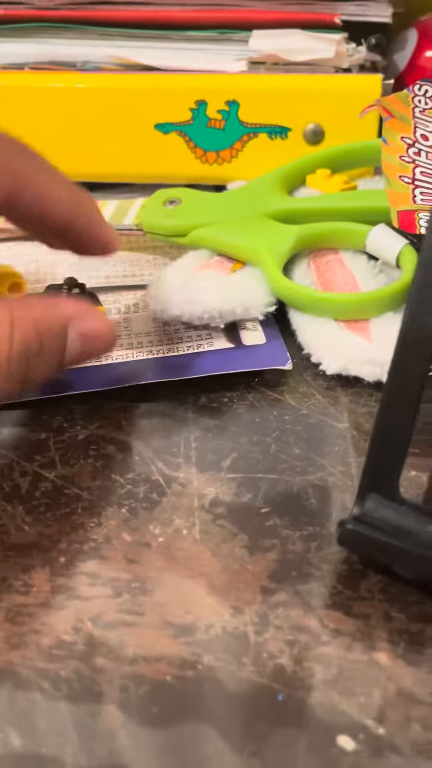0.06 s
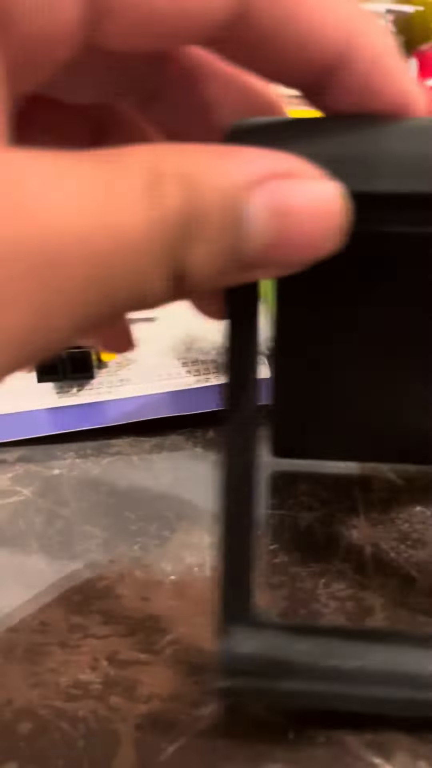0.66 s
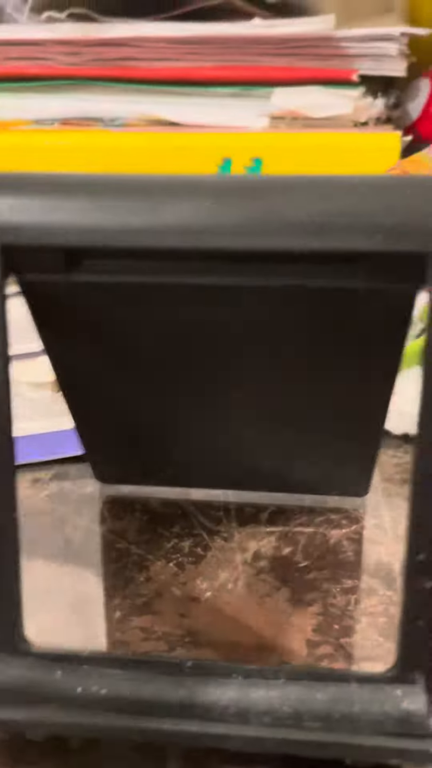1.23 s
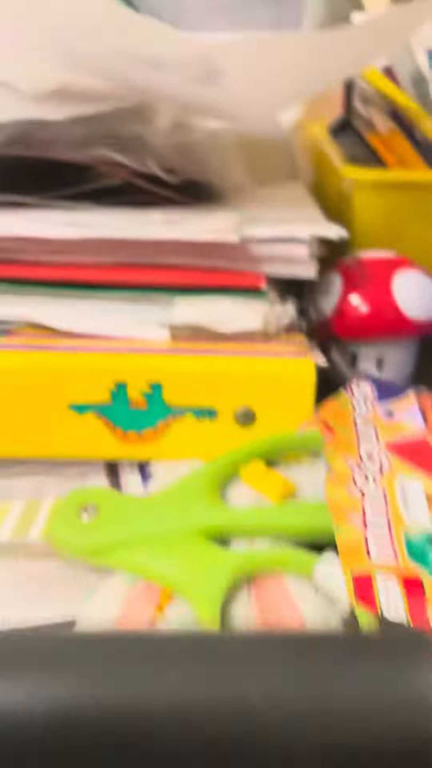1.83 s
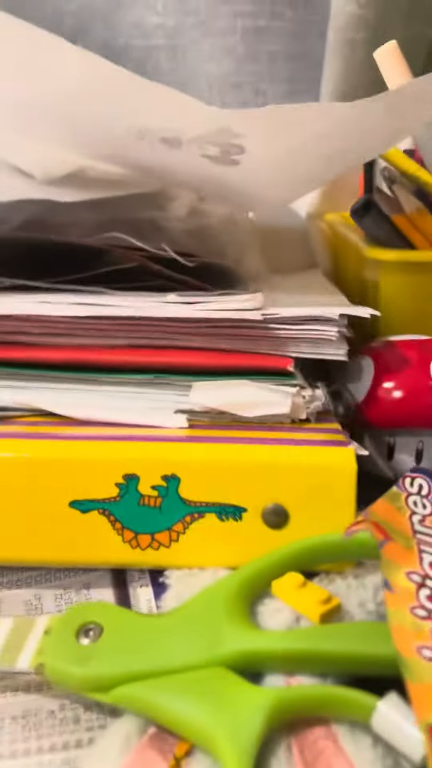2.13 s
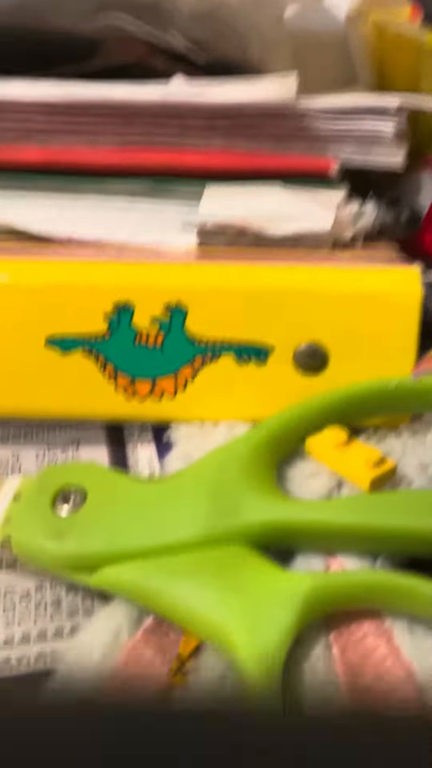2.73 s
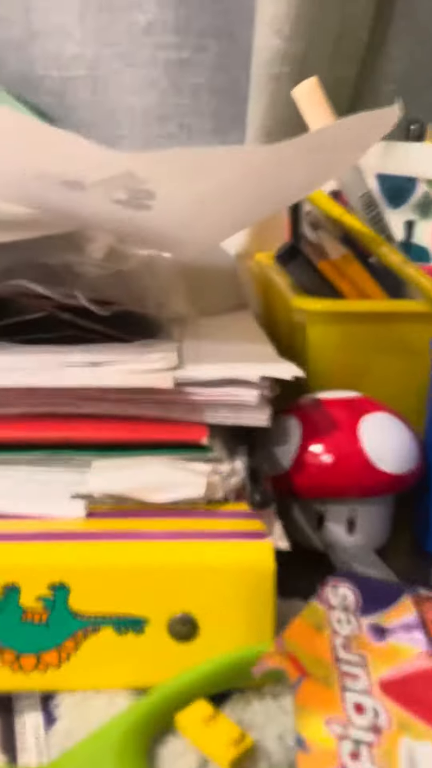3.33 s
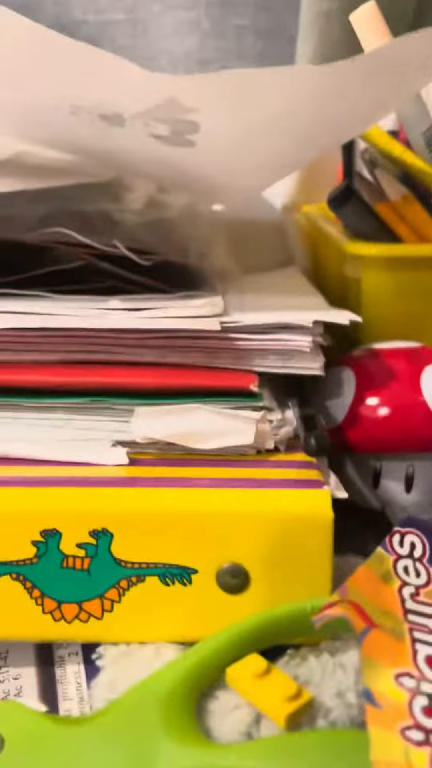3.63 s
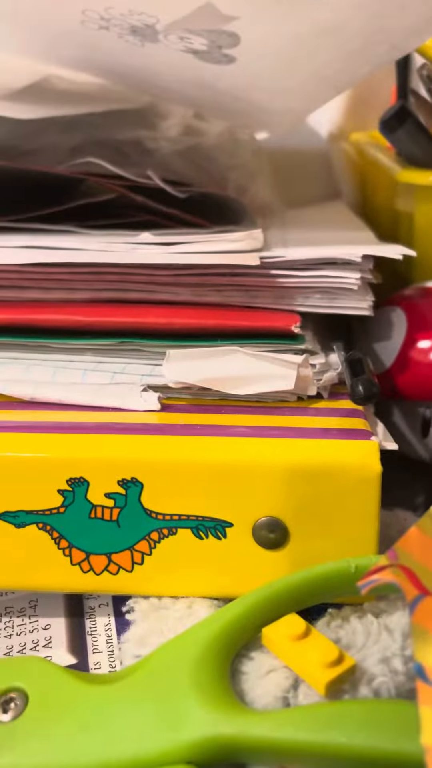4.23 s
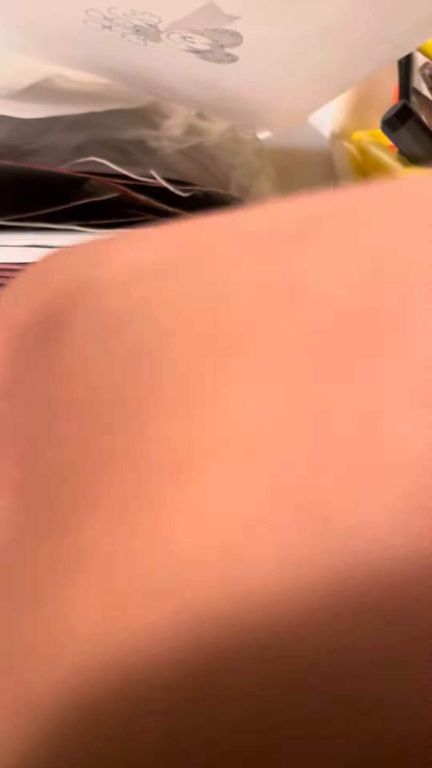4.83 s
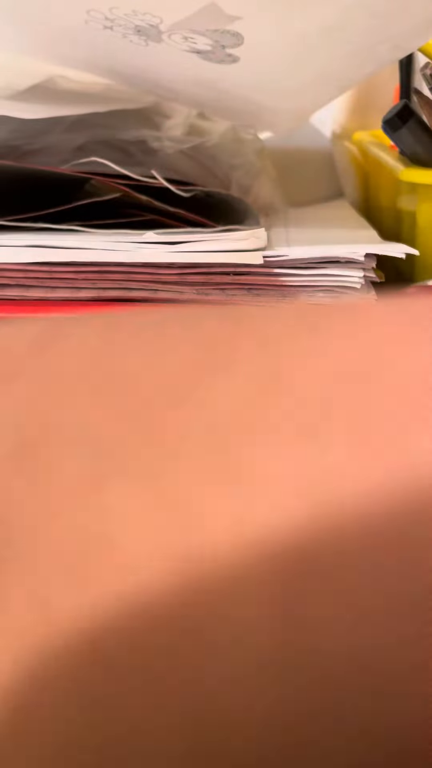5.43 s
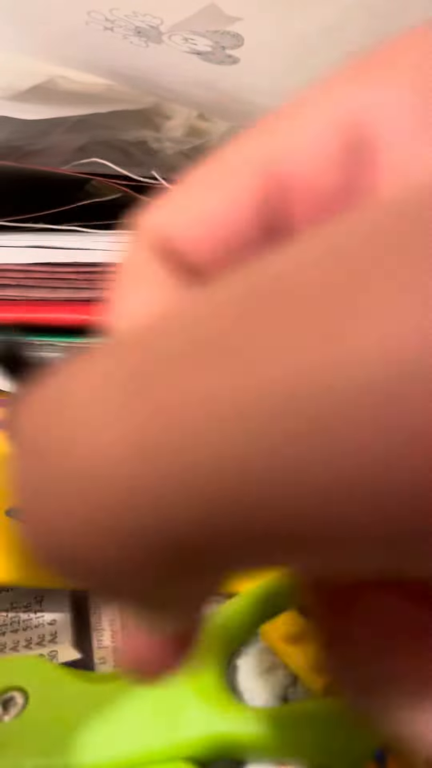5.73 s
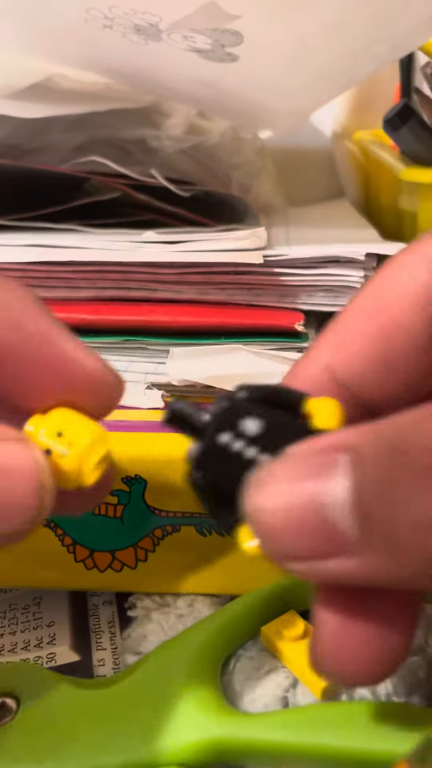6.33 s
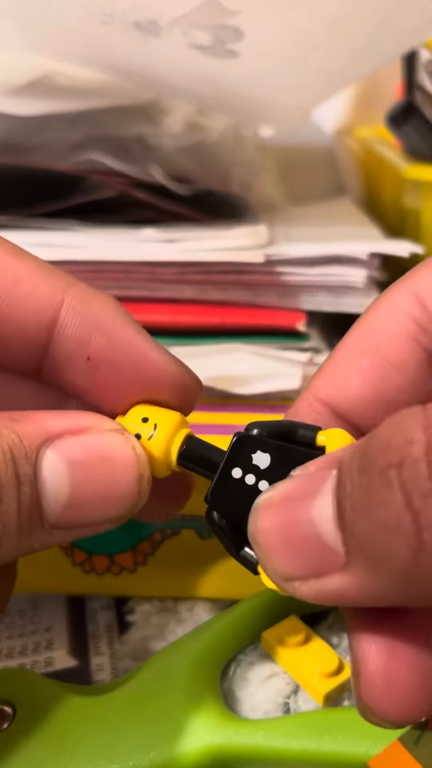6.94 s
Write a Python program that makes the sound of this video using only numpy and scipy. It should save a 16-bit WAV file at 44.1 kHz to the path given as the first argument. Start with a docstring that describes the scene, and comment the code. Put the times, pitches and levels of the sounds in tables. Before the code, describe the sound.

In a small room with a faint low hum, a phone and a plastic stand are moved about on a desk. Soft sliding and ticking give way to irregular clusters of bumps, heard through the phone's own housing. The second half turns lighter and brighter, as tiny plastic toy parts click and scrape between rubbing fingers. Everything is very close to the microphone, with almost no echo.

```python
"""A low mains hum fills a small room, and fingers start to slide and tick on plastic.
A phone is shifted on a desk beside a plastic stand: its case rubs, knocks and rattles through the housing.
Then fingers pick up small plastic toy parts, which scrape and click close to the two microphone ports.
Rubbing is noise from countless tiny slips; each contact is a scuff, a crack and a short modal ring."""
import sys
import numpy as np
from scipy import signal
from scipy.fft import rfft, irfft, next_fast_len
from scipy.io import wavfile
from scipy.ndimage import map_coordinates

SR = 44100
rng = np.random.default_rng(int(sys.argv[2]) if len(sys.argv) > 2 else 0)


def master(y):
    """Save y as 16-bit WAV."""
    cut = np.clip(np.atleast_2d(y).T, -1, 1)
    pcm = np.round(cut * 32767)  # scale
    wavfile.write(sys.argv[1], SR, pcm.astype(np.int16))


N = 307818
TIME_S = np.arange(N) / SR
HIT_S = np.arange(8192) / SR
SCUFF_SAMPLES = 600

# Mains hum, a faint side tone, the hum's octave. Each row: frequency in Hz, level in dB.
HUM_TONES = [(119.8, -54), (160, -75.5), (239.8, -72)]
# Hum and rumble, stronger once the phone has moved. Each row: time in seconds, gain in dB.
BACKGROUND_GAIN = [(0, -1.5), (.7, -1), (2, -1.5), (3.1, 0.5), (4, 2.5), (6.98, 2)]
# Parts dragged under pressure. Each row: start and end in seconds, level in dB, ring in Hz, ring Q.
SCRAPES = [(0, 0.04, -62, 3830, 1.5), (1.599, 1.778, -70, 766, 15), (1.634, 1.84, -73, 2005, 27),
           (1.893, 2.047, -87, 2225, 62), (2.902, 2.919, -38, 1510, 4.3), (3.301, 3.311, -47, 1330, 4.9),
           (3.65, 3.672, -61.5, 1950, 9.7), (4.49, 4.519, -44.5, 3500, 2.1), (4.73, 4.736, -49, 4550, 6.6),
           (5.06, 5.147, -46, 5650, 4.4), (5.143, 5.24, -60, 5300, 6.2), (5.271, 5.324, -49.5, 5250, 2.8),
           (5.661, 5.675, -40, 2120, 2.6), (5.755, 5.84, -55.5, 2010, 11),
           (5.757, 5.868, -62.5, 10800, 4.3), (6.037, 6.112, -58.5, 1490, 6.2),
           (6.254, 6.394, -58, 4000, 5)]
# Small parts tap, snap and rattle. Each row: time in seconds, level in dB, main ring in Hz,
# left-port lag in ms.
CLICKS = [(0.026, -59, 4250, 0), (0.423, -53, 5600, 0), (0.459, -54, 3370, 0), (0.529, -48, 3950, -0.013),
          (0.534, -54, 4200, 0), (0.548, -65, 5600, 0), (0.579, -50.5, 5500, 0),
          (0.664, -49.5, 3080, -0.07), (0.689, -49, 8400, 0), (0.706, -40.5, 5440, 0),
          (0.737, -57, 5030, 0), (0.76, -39, 5540, 0), (0.777, -48.5, 1930, 0.075), (0.941, -53.5, 9100, 0),
          (1.31, -60.5, 2160, 0), (1.44, -46, 2020, 0.38), (1.473, -35, 6260, 0.28),
          (1.519, -41, 5260, -0.56), (1.595, -44, 1990, -0.54), (2.141, -59, 2500, 0),
          (2.159, -33, 2600, 0.39), (2.286, -40.5, 3740, 0.45), (2.395, -55, 2130, 0.74),
          (2.417, -62, 2430, 0), (2.428, -48.5, 2300, -0.69), (2.442, -45, 2000, 0.34),
          (2.535, -57, 3000, 0), (2.611, -41.5, 5400, .2), (2.645, -64, 5100, 0), (2.766, -62, 1106, 0.23),
          (2.783, -43, 1410, 0.32), (2.791, -40.5, 1500, 0.33), (3.224, -47.5, 1234, 0),
          (3.28, -52, 2240, -0.099), (3.287, -39, 1890, -0.18), (3.423, -43, 1880, 0.2),
          (3.432, -48, 10060, 0), (3.446, -62.5, 2440, 0), (3.556, -43, 1290, -.2),
          (3.673, -26, 2060, 0.33), (3.68, -21.5, 2380, 0.13), (3.861, -41.5, 1400, 0.29),
          (3.878, -40, 910, 0.37), (4.057, -50, 682, 0.34), (4.487, -48, 5650, 0), (4.502, -33, 3620, 0.18),
          (4.512, -31, 2900, -0.044), (4.533, -21.5, 2000, 0.14), (4.538, -29.5, 1260, 0.11),
          (4.591, -41, 1260, 0.069), (4.621, -38, 860, 0.16), (4.631, -38, 1180, 0), (4.649, -37, 5500, 0),
          (4.693, -49, 9600, 0), (4.717, -26, 4760, -0.2), (4.718, -31, 11500, -0.34),
          (4.729, -42.5, 2060, 0), (4.747, -31.5, 11600, -0.087), (4.81, -37, 1050, -.6),
          (4.843, -72, 8000, 0), (4.93, -55, 4500, -0.086), (5.015, -52, 1930, 0.14),
          (5.071, -35.5, 3900, 0.013), (5.084, -27.5, 4200, 0.17), (5.1, -36, 6030, 0),
          (5.12, -36, 4900, 0), (5.137, -42, 3500, 0.23), (5.152, -46, 2800, 0), (5.213, -48, 1410, 0),
          (5.268, -49, 1010, 0), (5.311, -31, 5300, -0.45), (5.319, -29.5, 5240, -0.32),
          (5.355, -39, 2200, 0.011), (5.357, -41.5, 5500, 0), (5.428, -44.5, 4840, 0),
          (5.491, -58, 10100, 0), (5.578, -46, 2910, 0), (5.65, -48, 10000, 0), (5.66, -30, 1560, 0.25),
          (5.671, -42, 10100, 0.17), (5.746, -41.5, 800, 0.083), (5.771, -59, 1990, 0.11),
          (5.914, -43.5, 10100, 0), (5.945, -57, 9000, 0), (5.961, -44.5, 1590, -0.6),
          (6.031, -51, 2200, -.4), (6.091, -23.5, 2200, 0.28), (6.092, -27, 4100, 0.13),
          (6.093, -25, 10600, 0.18), (6.141, -30.5, 11600, -0.42), (6.151, -46.5, 2610, 0),
          (6.168, -48, 10300, 0), (6.271, -33.5, 4200, 0.26), (6.376, -39, 5900, 0),
          (6.385, -39.5, 790, 0.29), (6.425, -35, 4670, 0.21), (6.476, -39, 1820, -0.52),
          (6.498, -42, 1750, -0.47), (6.515, -50, 1860, -0.49), (6.697, -50.5, 4800, 0),
          (6.782, -51, 1803, 0)]
# Skin over plastic. Each row: start and end in seconds, hiss in dB, low rub in dB, brightness in dB.
STROKES = [(0.392, 0.785, -61.5, -73, 4.5), (0.797, 1.014, -67.5, -68.5, 6.5), (1.285, 1.45, -64, -57, 4.5),
           (1.426, 1.801, -64, -59, 4), (2.195, 2.306, -62.5, -56, -2.5), (2.365, 2.47, -66.5, -56.5, -5.5),
           (2.501, 2.92, -64, -58, -2.5), (2.884, 2.968, -58, -40, -4), (3.334, 3.439, -63, -52.5, 1),
           (3.493, 4.045, -72, -59, 3), (3.599, 3.667, -62.5, -57, 0), (4.171, 4.209, -64, -53.5, -6),
           (4.426, 4.47, -70, -57, -5.5), (4.474, 4.575, -53, -62, -1), (4.574, 4.848, -61, -54.5, -1.5),
           (4.879, 5.054, -66.5, -60.5, -5), (5.051, 5.425, -59, -54, 0.5), (5.464, 5.62, -65, -64, -2.5),
           (5.616, 5.847, -59.5, -57.5, 1.5), (5.855, 5.997, -65.5, -68.5, 1.5),
           (5.998, 6.168, -59, -55.5, -1.5), (6.177, 6.49, -60, -58, 1.5), (6.44, 6.581, -63, -67, -2),
           (6.604, 6.787, -71, -62.5, -3)]
# Case against stand or desk. Each row: time in seconds, body in dB, thud in dB,
# dullness in dB per octave, left-port lag in ms, main ring in Hz.
KNOCKS = [(0.969, -38.5, -57, 5.5, 0, 440), (0.979, -52, -36, 24, 0.2, 355),
          (1.345, -36.5, -41, 32, 0.79, 397), (1.458, -42, -41, 18, 0.66, 510),
          (1.477, -38.5, -33, 25, 0.51, 527), (1.597, -51, -44, 14, 0.53, 640),
          (1.61, -57, -38, 5, 0.024, 480), (1.633, -44.5, -36, 23, 0.42, 430),
          (2.158, -26.5, -33, 4.5, 0.58, 560), (2.17, -34.5, -27, 2.5, 0.95, 614),
          (2.178, -27, -33.5, 10.5, 0.57, 580), (2.231, -33, -45, 7, 0.48, 630),
          (2.286, -23.5, -24.5, 11, 0.74, 580), (2.29, -23, -21.5, 15, 0.8, 440),
          (2.609, -43.5, -42, 1.5, 0.18, 627), (2.658, -33.5, -45, 22, 0.67, 440),
          (2.688, -49.5, -42.5, 10, 0.59, 125), (2.845, -58.5, -42.5, 10.5, .3, 125),
          (2.913, -20.5, -40, 0.5, 0.76, 1150), (2.917, -16, -25.5, 1, 0.44, 760),
          (2.923, -26, -24.5, -2, 0.63, 199.4), (2.943, -28.5, -58.5, 1, 0.69, 700),
          (2.952, -23.5, -27, 3.5, 0.83, 380), (2.97, -25.5, -32.5, 4.5, 1, 260),
          (3.152, -63, -61.5, 16, 0.54, 600), (3.305, -32, -39, 2.5, 0.18, 950),
          (3.311, -23.5, -33.5, 5, 0.72, 1434), (3.313, -18.5, -29.5, 11, 0.74, 466),
          (3.331, -44, -37, 4, 0.56, 390), (3.345, -63, -43, 14, .4, 200), (3.369, -49, -55, 14, .4, 340),
          (3.402, -27, -35, 7.5, 0.74, 664), (3.411, -38, -27.5, 9, 1, 180),
          (3.426, -49, -24.5, 13, 0.88, 88), (3.652, -39, -28, 10.5, 0.69, 130),
          (3.674, -26, -38.5, 5, 0.23, 800), (3.679, -15.5, -25.5, 3.5, 0.6, 760),
          (3.682, -21.5, -19, 3, 0.6, 1270), (3.686, -20.5, -20, 8.5, 0.63, 950),
          (3.701, -43.5, -25.5, 12.5, .6, 130), (3.718, -45, -41.5, 6, 0.83, 1250),
          (3.732, -55, -34.5, 4, 0.47, 150), (3.795, -48.5, -48, 4.5, 0.41, 894),
          (3.869, -48.5, -56.5, 1.5, 0.44, 597), (4.19, -45, -51, 5, 0.16, 400),
          (4.36, -50.5, -52, 15, 0.37, 420), (4.387, -53.5, -42, 22, 0.24, 321),
          (4.664, -62, -41.5, 13, 0, 170), (4.766, -55, -42.5, 0, 0, 346), (5.671, -30, -46, 2, 0.24, 820),
          (5.683, -33.5, -29.5, 17, 0, 150), (5.721, -38, -36, 4.5, 0.2, 820)]
# Hollow ring of rubbed plastic. Each row: frequency in Hz, gain in dB.
RUB_MODES = [(760, -15.5), (1250, -18.5), (2100, -12), (3250, -1), (4500, -8.5), (5700, -9)]
# Struck modes. Each row: frequency in Hz, level in dB, T60 in seconds (capped in impact()).
PART_MODES = [(630, 1, 0.014), (1040, -5.5, 0.015), (1470, -2.5, 0.024), (1790, 8, 0.025),
              (2365, 0, 0.0097), (3200, -4, 0.12), (4300, 3.5, 0.15), (5750, -7, 0.021), (7700, -30, 0.038)]  # small parts and desk
CASE_MODES = [(78, 1, 0.078), (121.6, 2, 0.072), (228, 1.5, 0.03), (267, -13, 0.032), (371, 0.5, 0.04),
              (504, 7.5, 0.028), (732, 2, 0.039), (898, 3.5, 0.055), (1217, 6.5, 0.053), (1340, 7.5, 0.055),
              (1682, 9, 0.094), (1980, 3.5, 0.063), (2275, 2.5, .035), (2400, -4, 0.045),
              (3565, -7.5, 0.055), (3660, -2, 0.045), (4290, 3.5, 0.045), (5130, -4.5, 0.05),
              (6400, 4, 0.04)]  # stand and phone case
LOOSE_PART_MODES = [(611, -32, 0.06), (1010, -27.5, 0.082), (1360, -22, 0.035), (2130, -47, .065),
                    (3300, -36, 0.13), (4410, -36.5, 0.046), (5330, -40, 0.046), (8230, -43.5, 0.035),
                    (9000, -42, 0.04)]  # hard part flicked free
# Spectral shapes. Each row: frequency in Hz, gain in dB.
RUMBLE_EQ = [(20, 1), (45, 5), (80, 13.5), (160, 1.5), (230, -3.5), (320, -19), (600, -24), (1500, -29.5),
             (5000, -42), (8000, -87.5), (10500, -40.5), (16000, -77.5)]
HISS_EQ = [(600, 10), (1200, 8), (2200, 8), (3000, -0.5), (4800, 1.5), (6400, 0), (7700, -29), (9300, -2),
           (12200, -6), (14000, -19.5), (16000, -21.5)]
CLICK_EQ = [(3000, -7.5), (5500, -12), (11000, -12), (16000, -23.5)]
LOW_RUB_EQ = [(25, -6), (50, 17), (110, 25.5), (250, 19.5), (400, 14), (800, 3.5), (1400, -21.5),
              (2500, -43.5)]
CASE_EQ = [(2500, -4.5), (5500, -7), (10000, -15), (16000, -21)]
RASP_EQ, SWISH_EQ = [(2300, 0), (4500, -40)], [(5000, -40), (8500, 0)]


def undb(db):
    """Decibels to gain."""
    return 10 ** (np.asarray(db) / 20)


def unit_rms(x):
    """Scale to rms 1."""
    return x / np.sqrt(np.mean(x ** 2) + 1e-30)


def equalise(x, points):
    """Filter by (Hz, dB) points, joined in log frequency."""
    hz, db = np.transpose(points)
    size = next_fast_len(x.shape[-1])
    bins_hz = np.maximum(np.fft.rfftfreq(size, 1 / SR), 1)
    gain = undb(np.interp(np.log(bins_hz), np.log(hz), db))
    return irfft(rfft(x, size) * gain, size)[..., :x.shape[-1]]


def band(x, low_hz, high_hz, order=3):
    """Causal band-pass."""
    sos = signal.butter(order, [low_hz, min(high_hz, SR / 2 - 1)], "band", fs=SR, output="sos")
    return signal.sosfilt(sos, x)


def centres_hz(edges_hz):
    """Geometric centre of each band."""
    return np.sqrt(np.multiply(edges_hz[:-1], edges_hz[1:]))


def resonate(x, hz, q):
    """One resonance, gain 1 at its centre."""
    return signal.lfilter(*signal.iirpeak(min(hz, .45 * SR), q, fs=SR), x)


def drift(rate_hz):
    """Random curve, spread near 1."""
    steps = rng.standard_normal(4096)
    return np.interp(TIME_S * rate_hz, np.arange(len(steps)), steps)


def decay(t60_s):
    """Exponential decay of one hit."""
    return np.exp(-np.log(1000) * HIT_S / t60_s)


def add(out, x, start_s):
    """Mix x into out."""
    i = max(int(start_s * SR), 0)
    out[:, i:i + x.shape[1]] += x[:, :N - i]


def grainy_noise(eq, grain_db, width):
    """Stereo noise in 24-sample grains of unequal size, like the tiny slips of friction."""
    sizes = np.repeat(rng.exponential(size=N // 24 + 1), 24)[:N]
    mid, side = rng.standard_normal((2, N)) * undb(grain_db * np.minimum(sizes, 5))
    side = width * band(side, 290, 26000, order=1)
    return unit_rms(equalise(np.array([mid + side, mid - side]), eq))


def hum_and_rumble():
    """Slightly wavering mains hum, alike at both ports, over a soft room rumble."""
    hum = 0
    for hz, db in HUM_TONES:
        amplitude = np.sqrt(2) * undb(db + 1.2 * drift(6.6))
        hum += amplitude * np.sin(2 * np.pi * hz * TIME_S + .3 * drift(3.7))
    rumble = grainy_noise(RUMBLE_EQ, grain_db=0, width=.5) * undb(-62 + 0.43 * drift(9.9))
    return (hum + rumble) * undb(np.interp(TIME_S, *np.transpose(BACKGROUND_GAIN)))


def scrapes(attack_s=0.0031, release_s=0.0045):
    """Stick-slip bursts ring the dragged part; a sharper ring stands out more."""
    out = np.zeros((2, N))
    slips = grainy_noise(HISS_EQ, grain_db=2.0, width=0.21) * undb(7.4 * drift(240)) + crackle()
    for start_s, end_s, db, ring_hz, q in SCRAPES:
        burst = slips[:, int(start_s * SR):int(end_s * SR)]
        burst = burst + undb(-0.5) * q * resonate(burst, ring_hz, q)
        t = np.arange(burst.shape[1]) / SR
        envelope = np.minimum(t / attack_s, 1) ** 2 * np.minimum(t[::-1] / release_s, 1)
        add(out, undb(db) * unit_rms(burst * envelope), start_s)
    return out


def crackle(rate_per_s=95, scatter_db=7, ring_db=9.5, level_db=-0.5):
    """Tiny ridges catch and let go, each snap with its own mix of resonances."""
    catches = (rng.random(N) < rate_per_s / SR) * undb(scatter_db * rng.standard_normal(N).clip(-2, 2))
    snaps = catches * rng.standard_normal((2, N)).clip(-1, 1)
    rings = sum(resonate(snaps * rng.standard_normal(N).clip(-2, 2), hz, q=6.6) for hz, _ in RUB_MODES)
    return undb(level_db) * unit_rms(equalise(snaps + undb(ring_db) * rings, HISS_EQ))


def impact(modes, detune, main_hz, main_q, main_db, edges_hz, levels_db,
           crack_t60_s, tail_db, tail_t60_s, scuff_s, width, ring_db=-20, max_t60_s=.052):
    """A scuff swells into contact; crack, modes and tail decay. Band levels: energy spread over 10 ms."""
    hz, db, t60_s = np.transpose(modes)[:, :, None]
    # Grip and contact point retune and reweight the modes per hit.
    tuning, weight = rng.standard_normal((2, len(hz), 1))
    polarity = (-1) ** np.arange(len(hz))[:, None]
    waves = polarity * np.sin(2 * np.pi * hz * (1 + detune * tuning) * HIT_S)
    ring = np.sum(undb(db + 2.5 * weight) * waves * decay(np.minimum(t60_s, max_t60_s)), axis=0)
    noise = rng.standard_normal((5, len(HIT_S)))
    chatter = noise[0] + width * noise[1:3]
    out = 0
    for low_hz, high_hz, level_db in zip(edges_hz, edges_hz[1:], levels_db):
        life = (1000 / max(low_hz, 500)) ** 0.09  # treble dies first
        tail = undb(tail_db) * noise[3:] * decay(tail_t60_s * life)
        hit = chatter * decay(crack_t60_s * life) + undb(ring_db) * ring + tail
        hit[:, 0] += 4.0  # contact impulse
        hit = np.roll(hit, SCUFF_SAMPLES, axis=1)
        swell = np.exp(-HIT_S[:SCUFF_SAMPLES][::-1] / (scuff_s * life ** 2))
        hit[:, :SCUFF_SAMPLES] = .5 * life ** 2 * chatter[:, -SCUFF_SAMPLES:] * swell
        hit = hit + undb(main_db) * resonate(hit, main_hz, main_q)
        if low_hz <= 800:  # long waves reach both ports alike
            hit = hit[[0, 0]]
        delay_samples = int(.5 * SR / (high_hz - low_hz))  # trimmed so all bands peak together
        part = np.pad(band(hit, low_hz, high_hz)[:, delay_samples:], [(0, 0), (0, delay_samples)])
        out += undb(level_db) * unit_rms(part) * np.sqrt(.01 * SR / len(HIT_S))
    return out


def ports(x, lag_ms, knee_hz, air_share):
    """Lag between ports: the airborne share is constant; the rest shrinks as bending waves speed up."""
    hz = np.fft.rfftfreq(len(HIT_S), 1 / SR)
    lag_s = lag_ms / 1000 * (air_share + (1 - air_share) / np.hypot(1, hz / knee_hz))
    pair = irfft(rfft(x) * np.exp(1j * np.pi * np.outer([-1, 1], hz * lag_s)))
    fade_out = np.clip((.17 - HIT_S) / .04, 0, 1)
    return pair * fade_out


def clicks(below_db_per_octave=7, above_db_per_octave=10):
    """Small hard parts tap each other and the desk, each loudest near its main ring."""
    out = np.zeros((2, N))
    edges_hz = [350, 1200, 4500, 16000]  # body, clack, tick
    for time_s, db, main_hz, lag_ms in CLICKS + stray_ticks():
        octaves = np.log2(centres_hz(edges_hz) / main_hz)
        levels_db = db - np.maximum(-below_db_per_octave * octaves, above_db_per_octave * octaves)
        click = impact(PART_MODES, detune=.05, main_hz=main_hz, main_q=6, main_db=8,
                       edges_hz=edges_hz, levels_db=levels_db, crack_t60_s=.009,
                       tail_db=-28.5, tail_t60_s=0.055, scuff_s=0.00097, width=0.92)
        add(out, ports(click, lag_ms, knee_hz=5930, air_share=0.82), time_s - SCUFF_SAMPLES / SR)
    return equalise(out, CLICK_EQ)


def stray_ticks(count=40, scatter_db=4, centre_hz=2920, spread_octaves=0.44, spread_ms=0.38):
    """Chance light contacts, as strong as the rubbing that causes them. Rows as in CLICKS."""
    hiss_db = 20 * np.log10(stroke_gains()[0] + 1e-9)
    moments = rng.integers(0, N, count)
    chance = rng.standard_normal((count, 3)).clip(-2, 2)
    return [(i / SR, hiss_db[i] + 1 + scatter_db * force,
             centre_hz * 2 ** (spread_octaves * pitch), spread_ms * side)
            for i, (force, pitch, side) in zip(moments, chance)]


def stroke_gains(attack_s=.035, sag_db_per_s=12.5, release_t60_s=0.23):
    """Hiss, low rub, rasp and swish gains: the finger sets in, eases off and stops."""
    resting_db = [-86.5, -82, -86.5, -86.5]  # the grip is never quite still
    power = np.outer(undb(resting_db) ** 2, np.ones(N))
    for start_s, end_s, hiss_db, rub_db, bright_db in STROKES:
        levels_db = [hiss_db, rub_db, hiss_db - bright_db, hiss_db + bright_db]
        length_s = end_s - start_s
        t = np.arange(int((length_s + release_t60_s) * SR)) / SR
        fall_db = sag_db_per_s * t + 60 * np.maximum(t - length_s, 0) / release_t60_s
        envelope = np.minimum(t / attack_s, 1) * undb(-fall_db)
        add(power, np.outer(undb(levels_db), envelope) ** 2, start_s)
    return np.sqrt(power)


def rubbing(grip_db=8.5, grip_rate_hz=16, full_crackle_db=-61):
    """Hiss and low rub of fingers sliding on plastic, whose resonances come and go with the grip."""
    hiss_gain, rub_gain, rasp_gain, swish_gain = stroke_gains()
    slips = grainy_noise(HISS_EQ, grain_db=0.5, width=1.0)
    hollow = sum(undb(db + grip_db * drift(grip_rate_hz).clip(-2, 2)) * resonate(slips, hz, q=7.0)
                 for hz, db in RUB_MODES)
    catching = np.minimum(hiss_gain / undb(full_crackle_db), 1)  # light strokes catch less
    sliding = unit_rms(slips + hollow) + crackle() * catching
    rasp, swish = equalise(sliding, RASP_EQ), equalise(sliding, SWISH_EQ)
    hiss = (sliding - rasp - swish) * hiss_gain + rasp * rasp_gain + swish * swish_gain
    hiss *= undb(4.7 * drift(70) + 0.5 * drift(15))
    low_rub = grainy_noise(LOW_RUB_EQ, grain_db=3.5, width=0.53) * rub_gain
    low_rub *= undb(3.2 * drift(45).clip(-2, 2))
    return hiss, low_rub


def knocks(main_t60_s=0.021, clack_db=1.5, tick_db=-1):
    """The case bumps desk and stand; the softer the contact, the duller the blow."""
    out = np.zeros((2, N))
    edges_hz = [55, 220, 900, 2800, 15000]  # thud, body, clack, tick
    upper_hz = centres_hz(edges_hz)[1:]
    octaves = np.log2(upper_hz / upper_hz[0])
    housing_db = [0, clack_db, tick_db]
    for time_s, body_db, thud_db, dull_db_per_octave, lag_ms, main_hz in KNOCKS:
        levels_db = [thud_db, *(body_db - dull_db_per_octave * octaves + housing_db)]
        main_q = np.pi * main_hz * main_t60_s / np.log(1000)
        knock = impact(CASE_MODES, detune=.018, main_hz=main_hz, main_q=main_q, main_db=16.7,
                       edges_hz=edges_hz, levels_db=levels_db, crack_t60_s=0.016,
                       tail_db=-18, tail_t60_s=0.029, scuff_s=0.0026, width=0.52)
        add(out, ports(knock, lag_ms, knee_hz=815, air_share=0.24), time_s - SCUFF_SAMPLES / SR)
    return equalise(out, CASE_EQ)


def loose_part():
    """One small part springs free of the fingers and rings briefly."""
    out = np.zeros((2, N))
    ring = sum((-1) ** k * undb(db) * np.sin(2 * np.pi * hz * HIT_S) * decay(t60_s)
               for k, (hz, db, t60_s) in enumerate(LOOSE_PART_MODES))
    add(out, ports(ring, lag_ms=0.225, knee_hz=5900, air_share=0.75), start_s=4.533)
    return out


def near_reflections(x, delays_ms=(0.92, 1.7, 2.8), echo_db=-7, move_rate_hz=9):
    """Echoes off hand, desk and stand; the paths change as the hands move."""
    out = x
    for delay_ms in delays_ms:
        delay_s = delay_ms / 1000 * (1 + .2 * drift(move_rate_hz).clip(-2, 2))
        echo = np.array([map_coordinates(port, [(TIME_S - delay_s) * SR], order=1) for port in x])
        out = out + undb(echo_db) * echo
    return out / np.sqrt(1 + len(delays_ms) * undb(echo_db) ** 2)


def room(x, t60_s=0.088, wet_db=-18.5):
    """Short, dull reflections from the cluttered desk and the walls."""
    t = np.arange(SR // 2) / SR
    envelope = np.exp(-np.log(1000) * t / t60_s) * (t > .004)
    tail = band(rng.standard_normal((2, len(t))), 240, 5000, order=1) * envelope
    tail /= np.sqrt(np.sum(tail ** 2, axis=1, keepdims=True))
    return x + undb(wet_db) * signal.fftconvolve(x, tail, axes=1)[:, :N]


def scene():
    """Contacts and friction on the desk, in the humming room."""
    contacts = knocks() + clicks() + loose_part()
    hiss, low_rub = rubbing()
    friction = near_reflections(hiss + scrapes()) + low_rub
    return room(contacts + friction) + hum_and_rumble()


def record(dry):
    """The phone cuts the treble above 16.3 kHz."""
    return signal.sosfilt(signal.ellip(8, .2, 70, 16300, fs=SR, output="sos"), dry)


dry = scene()
out = record(dry)
master(out)
```